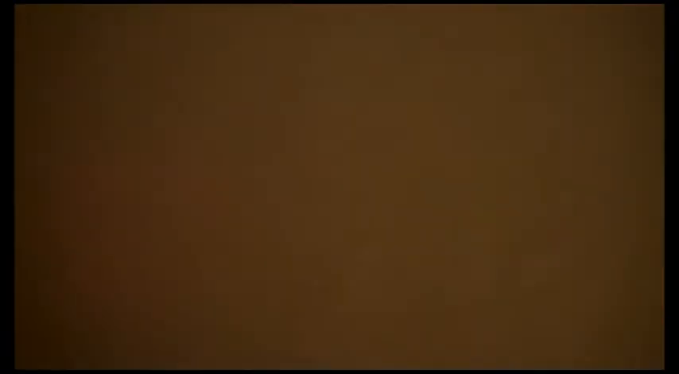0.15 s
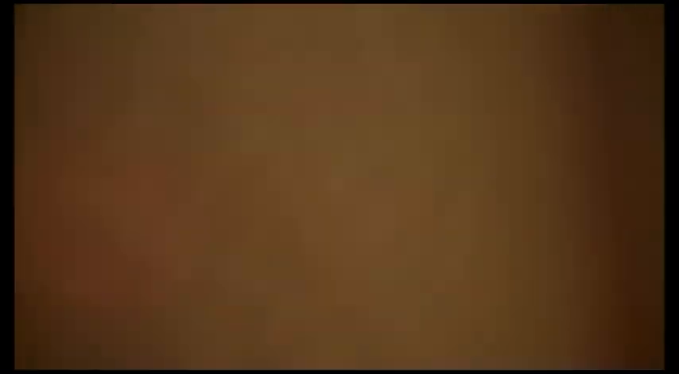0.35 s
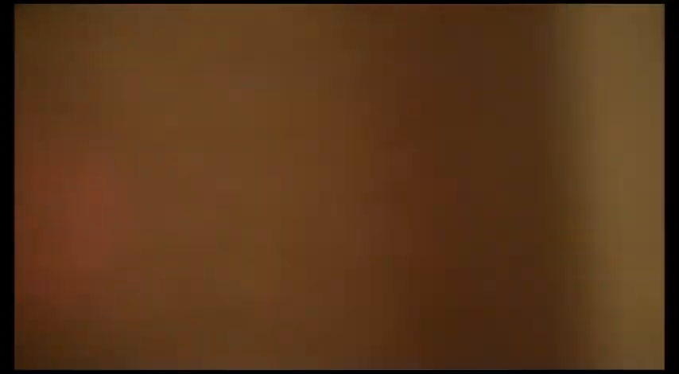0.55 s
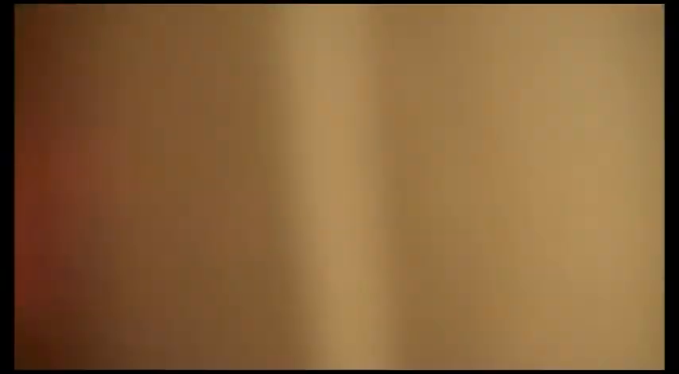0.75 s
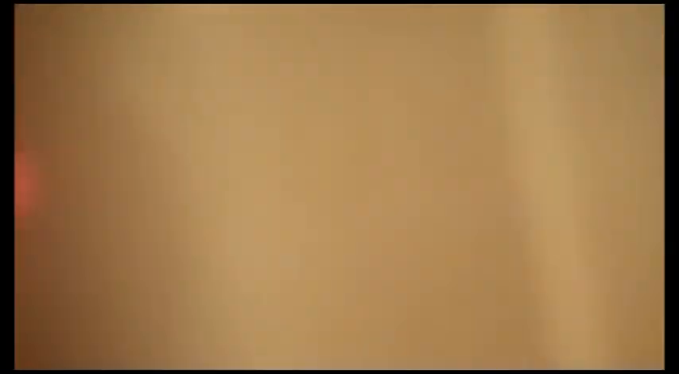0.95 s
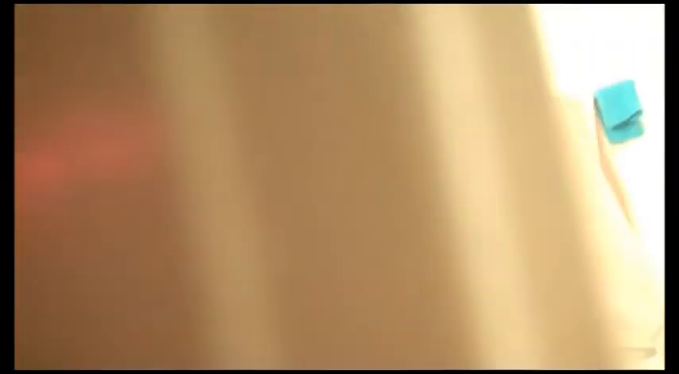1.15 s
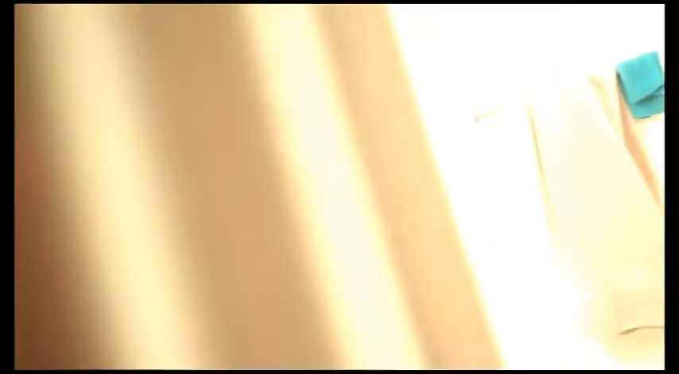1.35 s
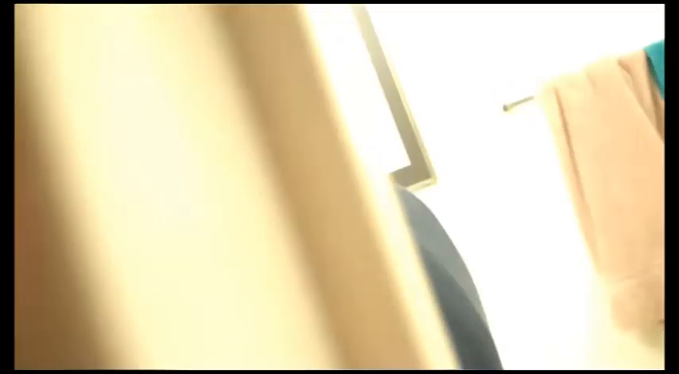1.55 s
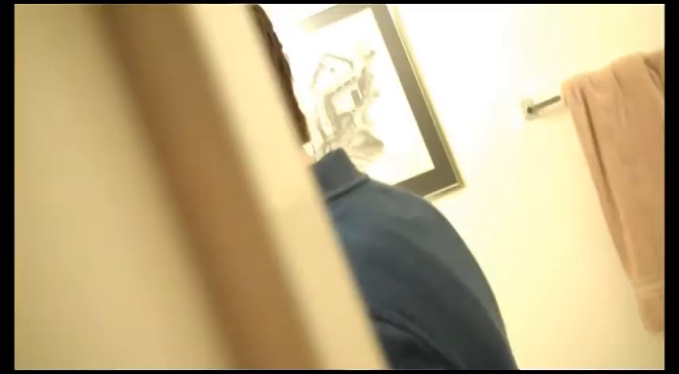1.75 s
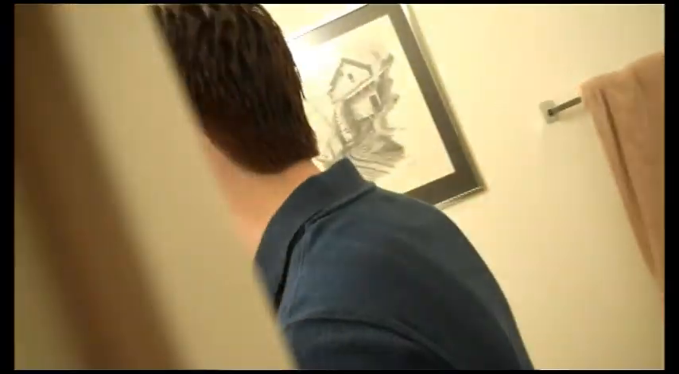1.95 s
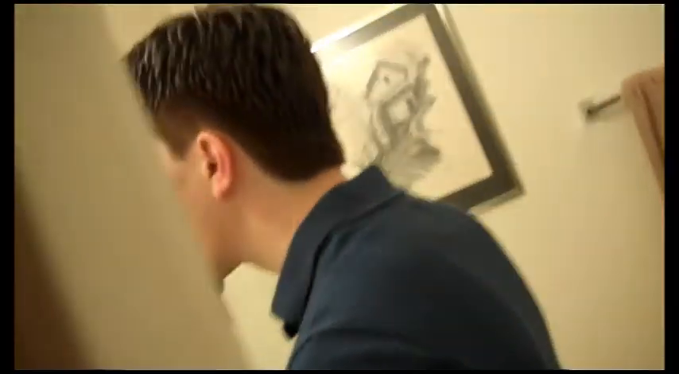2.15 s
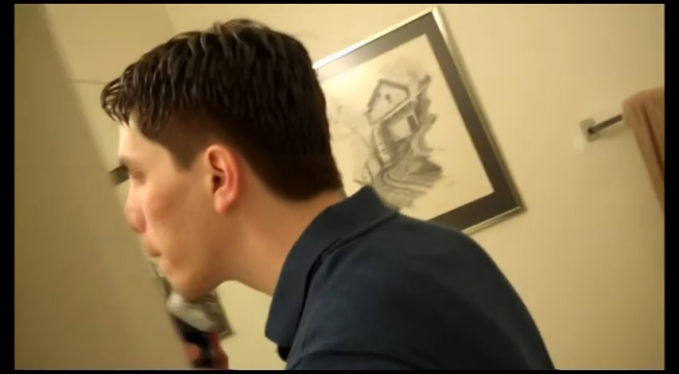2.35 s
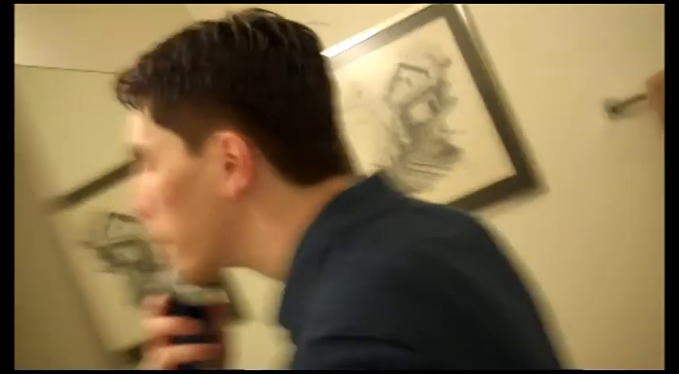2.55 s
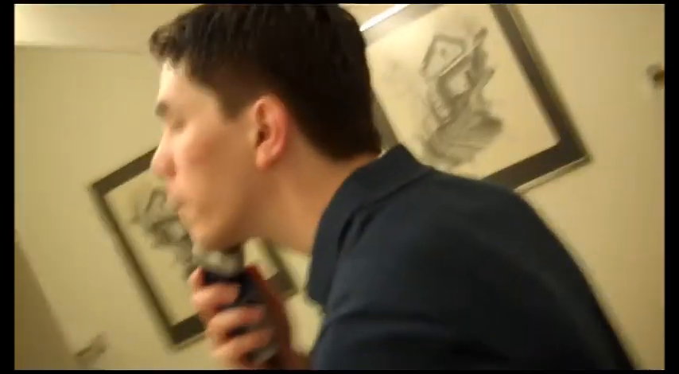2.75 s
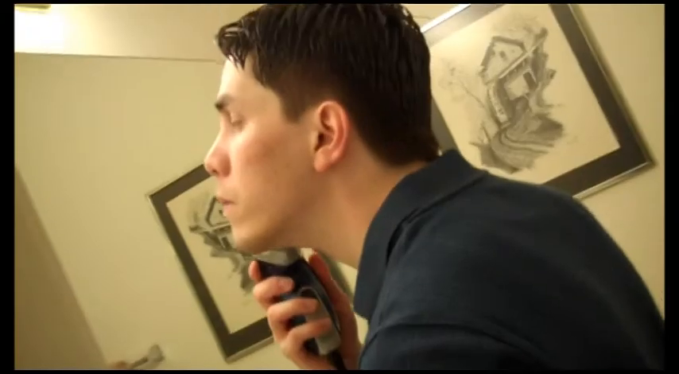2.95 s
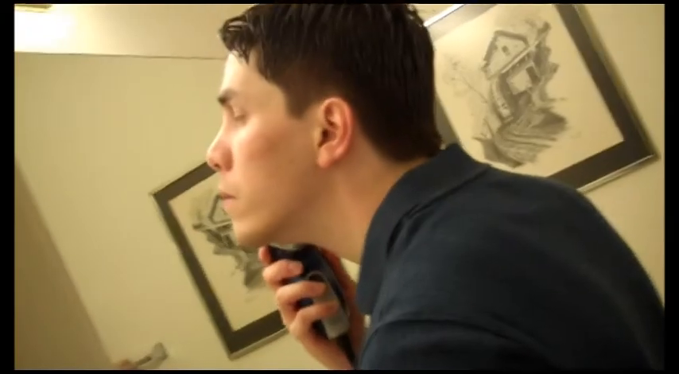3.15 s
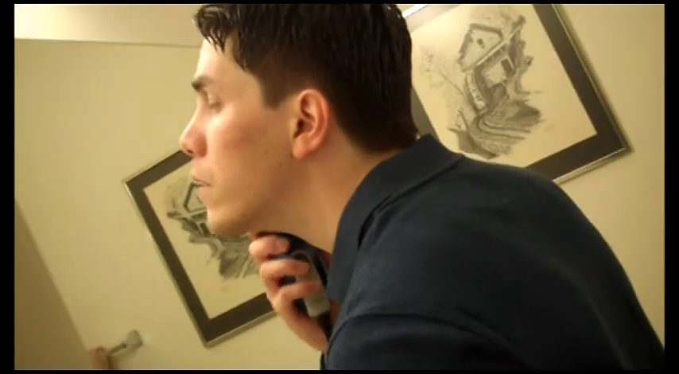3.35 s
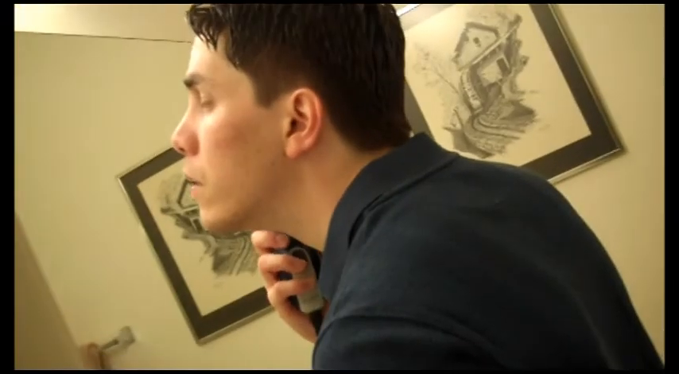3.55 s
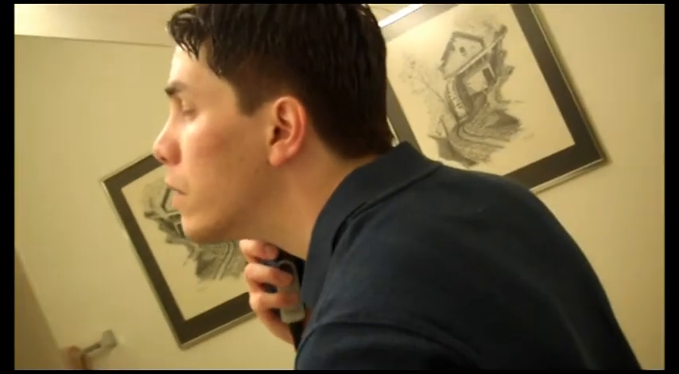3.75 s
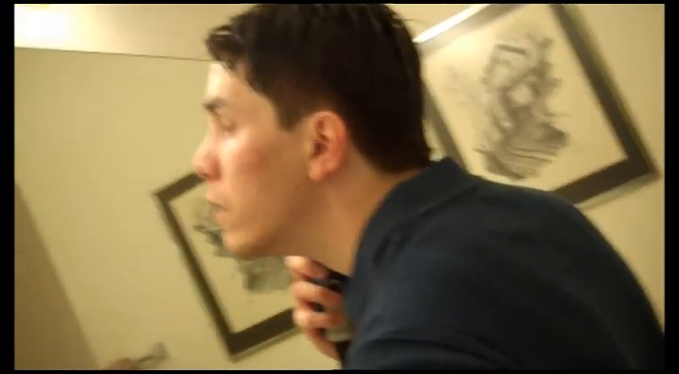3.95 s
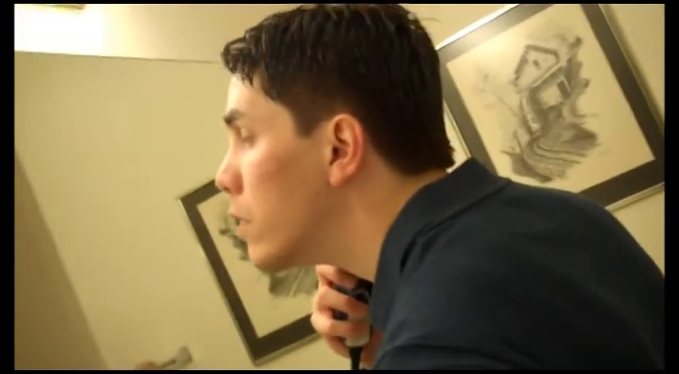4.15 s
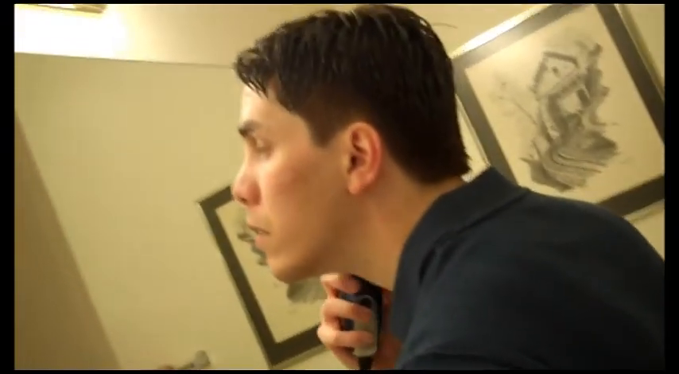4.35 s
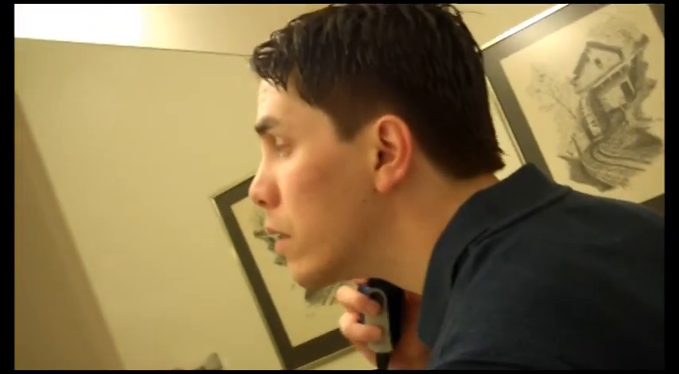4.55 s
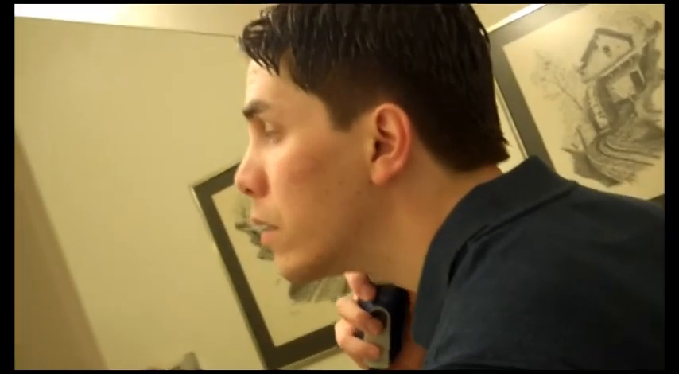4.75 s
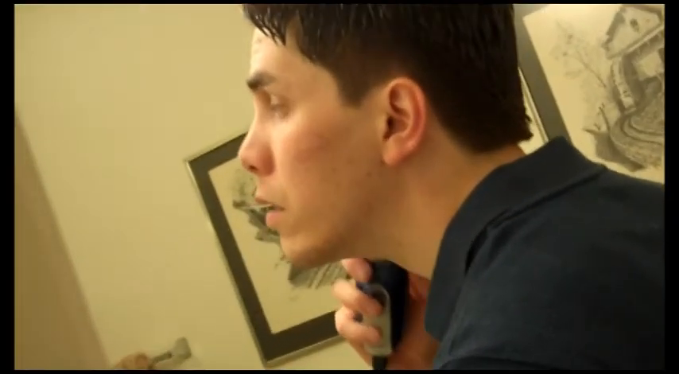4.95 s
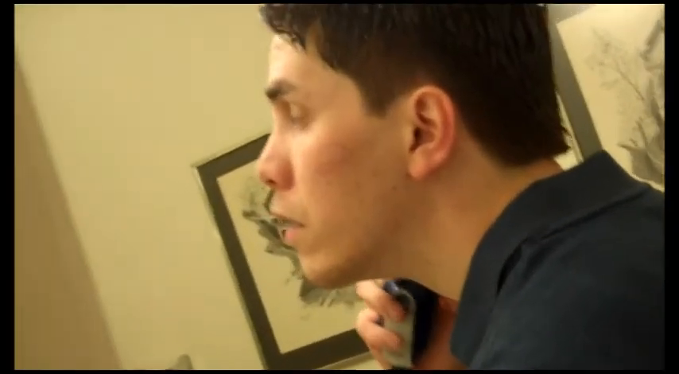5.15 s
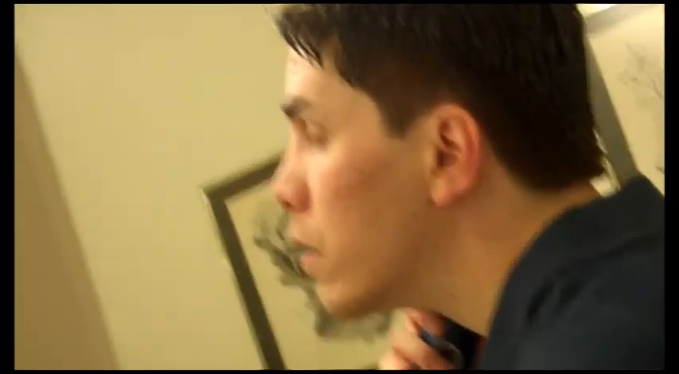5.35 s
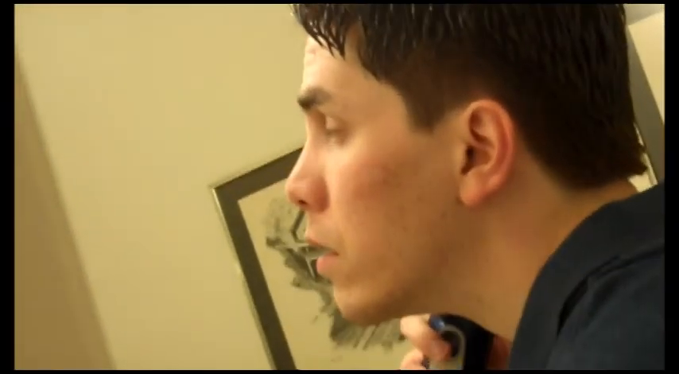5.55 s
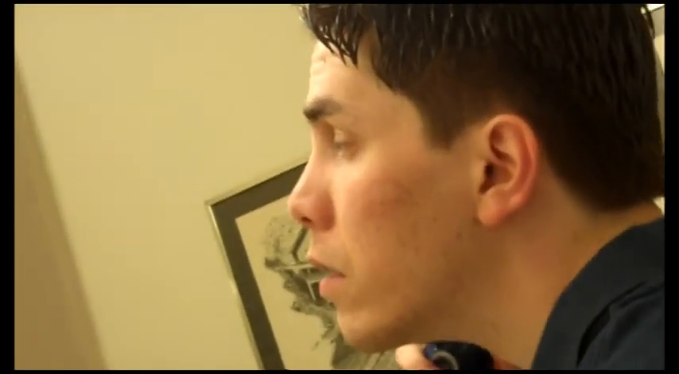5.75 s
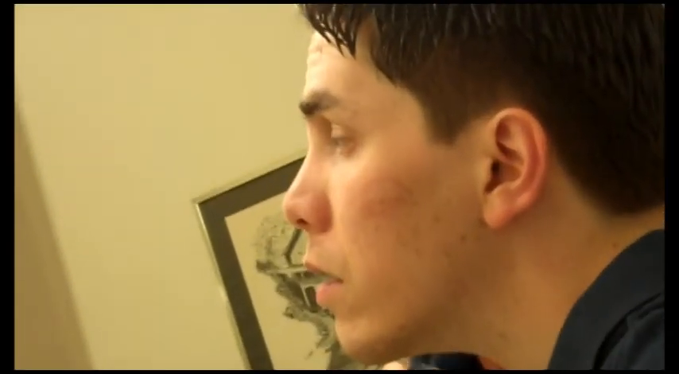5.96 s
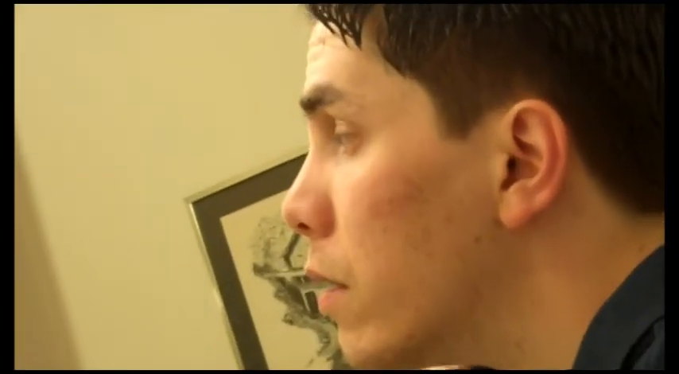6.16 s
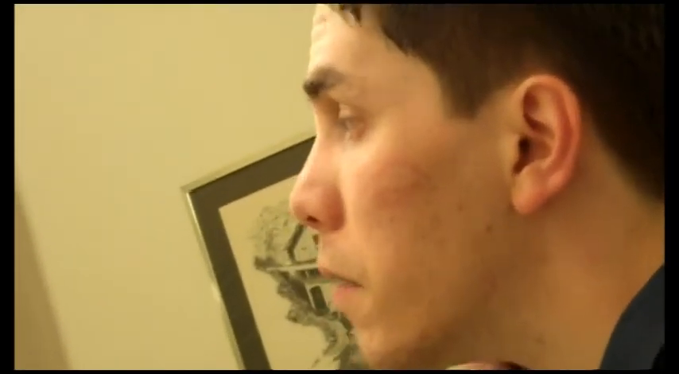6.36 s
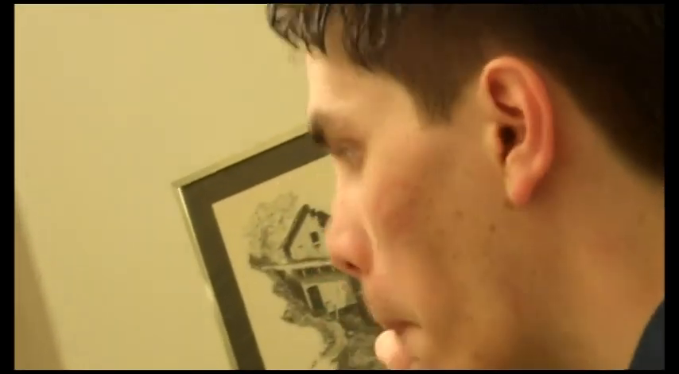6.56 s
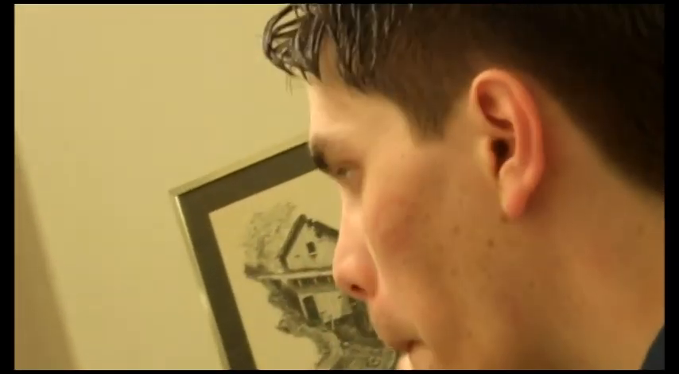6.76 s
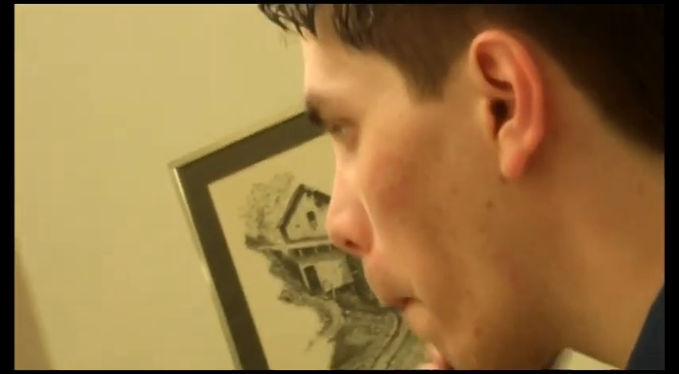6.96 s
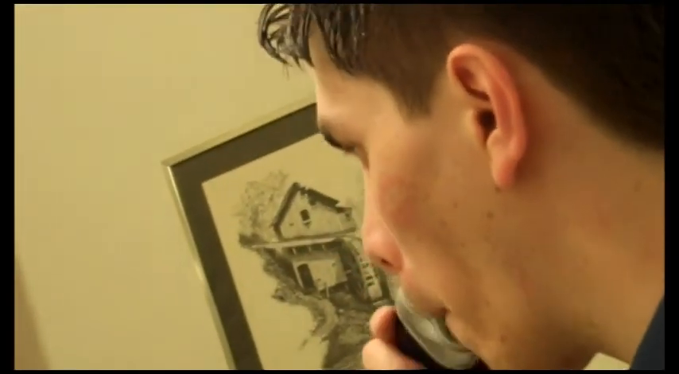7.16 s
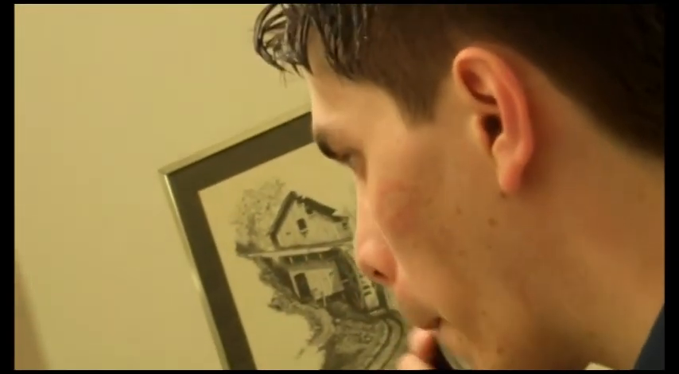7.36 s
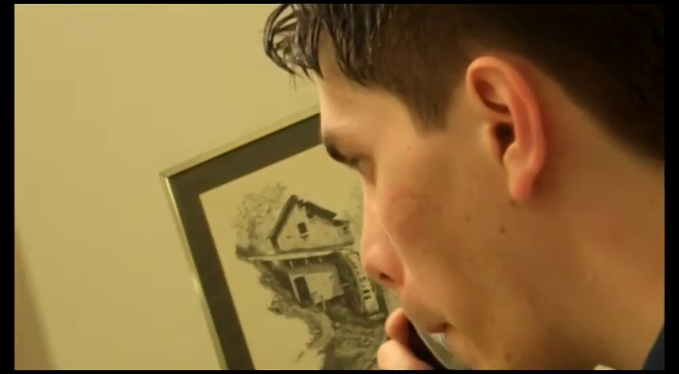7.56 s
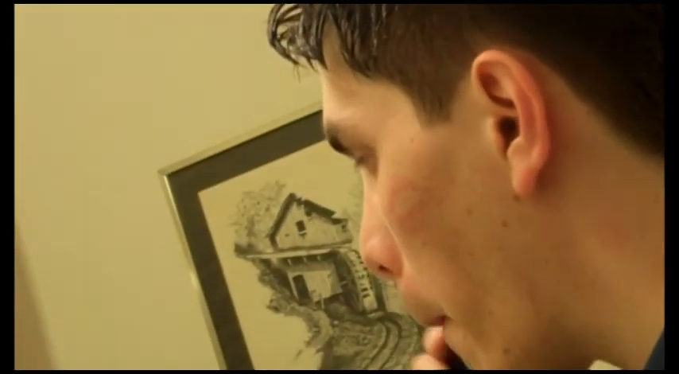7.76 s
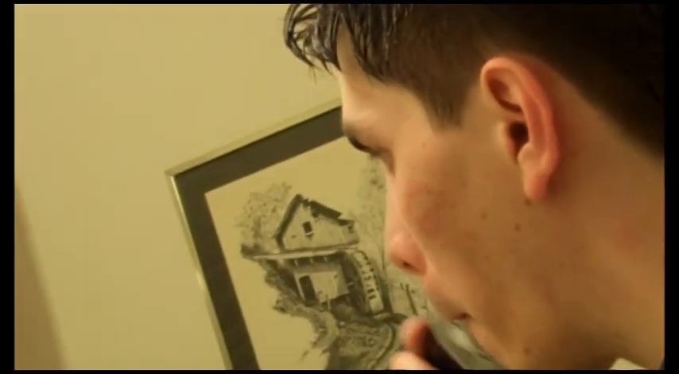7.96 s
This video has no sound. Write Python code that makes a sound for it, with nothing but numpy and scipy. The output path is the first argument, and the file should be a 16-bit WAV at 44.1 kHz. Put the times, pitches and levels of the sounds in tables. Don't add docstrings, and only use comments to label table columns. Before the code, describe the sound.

Continuous electric shaving in a small reverberant bathroom, picked up by a moving handheld microphone. Muffled buzz and low rustling of fingers come first, then brighter cutter hiss and a stronger whining motor. The tone shifts with skin pressure, with short scratchy swells and thin ringing resonances. A very quiet fan hum lies beneath, and a tiny cloth creak passes midway before the shaver carries on to the end.

```python
import sys
import numpy as np
from scipy import signal
from scipy.fft import rfft, irfft, next_fast_len
from scipy.io import wavfile
from scipy.ndimage import uniform_filter1d

SR = 44100
rng = np.random.default_rng(int(sys.argv[2]) if len(sys.argv) > 2 else 0)


def amp(db):
    return 10 ** (np.asarray(db, float) / 20)


def write(x):
    x = np.atleast_2d(x).T
    wavfile.write(sys.argv[1], SR, np.round(np.clip(x, -1, 1) * 32767).astype(np.int16))


N = 356945
PADDED = next_fast_len(N + SR)
FREQS_HZ = np.maximum(np.arange(PADDED // 2 + 1) * SR / PADDED, 1)
COARSE_S = np.arange(N // 64 + 2) * 64 / SR

# (time [s], peak level [dB], mode [Hz])
CREAK_JERKS = [
    (3.349, -42, 410),
    (3.36, -42, 400),
    (3.371, -38, 454),
    (3.404, -40.5, 445),
    (3.416, -41.5, 460),
    (3.432, -44, 450),
    (3.456, -43.5, 447),
    (3.493, -48.5, 395),
]
# (time [s], speed [turns/s])
MOTOR_SPEED = [(0, 103), (1.35, 99.6), (1.9, 98.5), (2.2, 102), (2.58, 101.8), (3.3, 105.6), (3.45, 103.8),
               (4.1, 102.5), (4.5, 104.6), (4.86, 101.5), (5.06, 107.6), (5.4, 106.3), (6.3, 105.6),
               (6.58, 107.3), (7.25, 105.8), (7.55, 102.5), (7.85, 102.7), (7.92, 105.8)]
# (order [multiple of speed], level [dB])
MOTOR_ORDERS = [(3, -76.5), (4, -78), (5, -74), (6, -72), (7, -68.5), (8, -72.5), (9, -71), (10, -66),
                (13, -67.5), (18, -59.5)]
# (start [s], end [s], lift [dB])
FREE_GRIP = [(1.3, 2.0, 5), (2.21, 2.322, 8), (2.544, 4.098, 7), (4.292, 4.4, 7), (5.3, 5.46, 8),
             (5.502, 6.304, 2.5), (6.683, 7.105, 6.5), (7.22, 8.04, 3.5)]
# (start [s], end [s], whine lift [dB], second multiple lift [dB])
GEAR_LOADS = [(0.852, 1.33, 2, -11), (1.356, 1.71, 10, -14.5), (1.776, 2.012, 9.5, 2),
              (2.164, 2.423, 6.5, 2), (2.548, 3.003, 11.5, -19), (3.0, 3.743, 12, -13),
              (3.748, 4.08, 6.5, 4), (4.08, 4.3, 2.5, 6), (4.335, 4.499, 9.5, 4), (4.5, 4.62, 7.5, -7),
              (4.62, 4.876, 0, 8), (4.89, 5.35, 8.5, -6), (5.35, 5.595, 8, -4), (5.594, 5.8, 9, 2.5),
              (5.796, 6.33, 8, -7), (6.342, 6.45, 5, 7), (6.458, 6.653, 10, 2), (6.967, 7.048, 14.5, -13),
              (7.054, 7.2, 8, -5), (7.202, 7.315, 8, 10.5), (7.321, 7.413, 1, 11), (7.9, 8.038, 13, -4),
              (8.023, 8.2, 7.5, -11)]
# (time [s], pitch scatter [Hz])
GEAR_PLAY = [(0, 16), (1.72, 16), (1.8, 34), (2.15, 22), (2.5, 22), (2.7, 38), (4.6, 36), (4.9, 30),
             (8.1, 38)]
# (time [s], level [dB])
NEARNESS = [(0.0, -36.5), (0.02, -38), (0.65, -36.5), (1.87, -32), (2.05, -32.5), (2.32, -30.5),
            (2.41, -33), (2.79, -30.5), (3.7, -32), (3.76, -31), (6.44, -32), (6.58, -31.5), (6.67, -33),
            (7.37, -30), (7.5, -31), (7.89, -29.5), (8.0, -32), (8.09, -29.5)]
# (time [s], left minus right [dB])
STEREO_LEAN = [(0.0, -2.5), (0.38, -3.5), (0.85, -4), (1.62, -1), (3.54, -1.5), (4.8, -1.0), (5.97, -1),
               (6.35, -1), (8.09, -1)]
HISS_CENTRES_HZ = (350, 1500, 5500, 12000)
# (frequency [Hz], density [dB/Hz])
LEFT_PORT = [(250, -34.5), (500, -28), (1000, -20), (2900, -15), (4300, -12), (5500, -9), (6200, -11),
             (6800, -4), (7500, -6), (9000, -20), (11500, -32), (12500, -31.5), (13400, -28.5),
             (14300, -31)]
RIGHT_PORT = [(250, -38.5), (500, -28), (1000, -19), (2900, -12.5), (4300, -9), (5200, -4.5), (5800, -2.5),
              (6500, -9), (7300, -14), (8500, -25.5), (9600, -31), (11000, -44), (12500, -40), (14300, -47)]
# (frequency [Hz], likeness [0-1])
LIKENESS = [(60, 0.17), (150, 0.66), (370, 0.95), (940, 0.91), (2340, 0.49), (5850, 0.061), (14600, 0.47)]
# (frequency [Hz], width [Hz], lift [dB])
RESONANCES = [(447, 35, -2.5), (630.5, 8, 9), (1129, 58, 5), (1386, 25, 0.5), (1566, 190, 3), (1899, 37, 4),
              (2211, 47, 5), (3336, 70, 4.5), (3400, 660, 1), (6230, 320, 3.5), (5860, 67, 4),
              (3000, 180, -1), (1055, 27, 4), (3990, 60, 2), (4770, 200, 1.5)]
# (time [s], half-length [s], frequency [Hz], lift [dB])
SHADING = [(0.43, 0.25, 1980, -6.5), (0.3, 0.25, 3300, 5.5), (0.93, 0.47, 680, -14.5),
           (0.92, 0.31, 3300, -1), (1.1, 0.95, 1660, 5), (2.1, 0.32, 2000, -5.5), (2.58, 0.11, 2200, 1),
           (2.82, 0.22, 4300, 3.5), (0.7, 0.17, 2840, 0), (1.15, 0.087, 3600, -1), (2.74, 0.28, 1360, -6),
           (3.64, 0.23, 1870, 4.5), (3.87, 0.47, 4600, -5), (6.94, 0.21, 5400, 2), (7.36, 0.15, 1400, 4.5),
           (0.76, 0.24, 4760, -5), (0.6, 0.18, 2870, -6), (5.68, 0.21, 4800, -6.5), (6.6, 0.064, 1150, 8),
           (1.58, 0.16, 5200, 3.5), (5.0, 0.099, 1980, -14), (7.97, 0.13, 2400, -4.5),
           (7.4, 0.33, 14000, 6), (5.4, 0.079, 5600, 0.5), (7.6, 0.13, 3600, -2.5), (5.1, 0.11, 5600, -1.5),
           (2.47, 0.076, 4200, -1.5), (0.48, 0.12, 4900, -4.5), (6.27, 0.23, 4800, -3.5),
           (0.3, 0.2, 4200, -2), (0.77, 0.64, 6700, -3), (0.085, 0.14, 6500, -2.5), (4.57, 0.2, 5600, -3),
           (5.1, 0.36, 4100, -2.5), (0.92, 0.25, 4300, -2), (2.93, 0.16, 3700, -2), (5.9, 0.15, 6000, 1),
           (4.03, 0.27, 8800, -5), (3.1, 0.16, 4700, -2)]
# (time [s], half-length [s], lift [dB])
STROKES = [(1.86, 0.094, 5.5), (2.28, .06, 1.5), (2.93, 0.44, 2.5), (3.2, 0.034, 1.5), (3.75, 0.17, 1),
           (4.15, 0.12, 1.5), (4.72, 0.2, 3.5), (5.22, 0.14, 3), (5.7, 0.066, 0), (6.2, 0.28, 2),
           (7.41, 0.049, 5), (7.7, 0.068, 1), (7.84, 0.024, 4)]
STROKE_REACH = (0.78, 1, 0.11, 0.14)
# (time [s], half-length [s], lift [dB])
HANDLING = [
    (.3, 0.2, 10.5),
    (.5, 0.036, 6),
    (.9, 0.31, 12),
    (2.45, 0.29, 4),
    (4.12, 0.085, 3),
    (5.05, 0.37, 1.5),
]
# (start [s], end [s],
# frequency [Hz], level [dB])
SINGING = [(.05, .25, 1170, -62), (.8, 1.05, 1680, -54), (1.07, 1.33, 1640, -50), (1.0, 1.62, 1152, -50.5),
           (1.1, 1.7, 1795, -60), (.95, 1.25, 700, -65), (1.4, 1.78, 632, -62), (2.6, 3.1, 1135, -61),
           (3.45, 3.8, 3730, -53), (3.8, 4.1, 3770, -55), (5.1, 6.6, 742, -66), (3.0, 3.9, 1960, -59),
           (4.0, 4.4, 3630, -53), (4.6, 4.95, 3625, -54), (4.9, 8.1, 1421, -61), (3.3, 8.1, 2181, -60),
           (2.85, 3.3, 1510, -57), (5.8, 6.1, 630, -63), (1.15, 1.4, 1390, -60), (.55, .75, 2190, -62),
           (7.0, 7.4, 1480, -58), (1.95, 2.5, 3350, -55), (3.8, 4.3, 3365, -53), (4.65, 4.87, 4020, -53),
           (7.2, 7.45, 3750, -53), (7.5, 7.9, 3350, -53), (2.6, 4.0, 1737, -60), (3.2, 8.1, 1362, -64),
           (1.25, 1.7, 2140, -56), (7.75, 8.2, 4680, -50), (6.1, 7.1, 1062, -60)]
# (time [s], half-length [s], frequency [Hz], width [Hz], level [dB])
FOCUS = [(2.27, .07, 4600, 110, -41.5), (2.78, .13, 4650, 100, -40), (2.31, .025, 6200, 130, -39),
         (3.58, .045, 1800, 110, -46), (1.88, .06, 1650, 90, -46), (7.41, .02, 1800, 130, -44),
         (6.95, .06, 5250, 90, -44), (7.86, .08, 4700, 90, -44), (7.35, .1, 5700, 90, -42),
         (3.0, .12, 5900, 110, -44), (4.3, .1, 5850, 70, -44), (7.95, .2, 1480, 50, -51),
         (1.14, .04, 1700, 70, -47), (3.78, .07, 6450, 110, -43), (5.38, .08, 6050, 100, -44),
         (2.92, .08, 950, 80, -53), (7.82, .1, 5850, 100, -44), (1.88, .1, 6150, 150, -43),
         (2.12, .12, 6600, 120, -45), (3.85, .08, 6300, 110, -44), (3.5, .12, 5830, 70, -45),
         (2.75, .12, 5600, 90, -45), (6.2, .15, 6050, 90, -45), (2.75, .1, 4050, 90, -48),
         (1.2, .12, 5300, 150, -48)]
# (low [Hz], high [Hz], until [s])
MASKED_EDGE = [
    (10, 130, .46),
    (130, 200, .27),
    (200, 240, .18),
]
# (frequency [Hz], signal over step [dB])
ROUNDING = [(100, 18), (350, 19), (900, 21), (1900, 8.5), (3400, 11), (5000, 19), (7500, 11), (8700, 2),
            (9800, -5.5), (11300, -8.5), (13300, -6), (14200, -10)]
# (frequency [Hz], coarseness [dB])
RIGHT_COARSER = [(7000, 0), (8300, 3), (9300, 1.5), (11500, -1)]

USUAL_DB = -32.5
HISS_FOLLOWS = (0.16, 0.82, 1.26, 0.58)
STROKE_HZ, STROKE_OCTAVES, STROKE_FOCUS = 1800, 0.38, 0.65
SHADE_OCTAVES = 0.22
TEETH_PER_TURN = 31.5
WHINE_DB, SECOND_DB, WHINE_EDGE_S = -51.5, 3.5, 0.019
RUNOUT, HALF_RUNOUT = 0.35, 0.35
DOOR_OPENS_S, DOOR_MUFFLES_DB = 1.3, -4.5
ROOM_T60_S, ROOM_DB = 0.4, -8
FAN_HZ, FAN_DB = 120.0, -68.5
SELF_NOISE_DB = -66
OFFSET, SETTLE_S = (-0.105, 0.105), 0.087
GRID, HOP = 672, 1024
JOINT_BELOW_HZ, STEEP_SHARE = 6000, 0.42
STARVED_DB, STARVED_HZ, STARVED_UNTIL_S = 11, 2600, 1.3


def rms_one(x):
    return x / np.sqrt(np.mean(x ** 2) + 1e-20)


def in_time(rows):
    s, *columns = np.transpose(rows)
    return [np.interp(np.arange(N) / SR, s, c) for c in columns]


def at_hz(points, hz):
    points_hz, values = np.array(points).T
    return np.interp(np.log(hz), np.log(points_hz), values)


def fine(coarse):
    return np.interp(np.arange(N) / SR, COARSE_S, coarse)


def drift(rate_hz):
    r = np.exp(-128 * np.pi * rate_hz / SR)
    noise = rng.standard_normal(len(COARSE_S) + 2000)
    slow = signal.lfilter([1], [1, -2 * r, r * r], noise)[2000:]
    return rms_one(slow - slow.mean())


def bumps(rows):
    return sum(db * np.exp(-((COARSE_S - at) / half) ** 2) for at, half, db in rows)


def held(start, end, edge):
    return np.clip(np.minimum(COARSE_S - start, end - COARSE_S) / edge + 0.5, 0, 1)


def fan():
    level = fine(amp(FAN_DB + 0.67 * drift(7.8)))
    return np.sqrt(2) * level * np.sin(2 * np.pi * FAN_HZ * np.arange(N) / SR)


def creak():
    t, out = np.arange(SR // 10) / SR, np.zeros(N)
    shape = (1 - np.exp(-t / 0.0025)) * amp(-60 * t / 0.055)
    for s, db, hz in CREAK_JERKS:
        out[round(s * SR):][:len(t)] += amp(db + 5.5) * shape * np.sin(2 * np.pi * hz * t)
    return out


def in_room(x):
    t = np.arange(SR // 2) / SR
    tail = rng.standard_normal((2, len(t))) * amp(-60 * t / ROOM_T60_S) * (t > 0.003)
    tail *= amp(ROOM_DB) / np.sqrt(np.sum(tail ** 2, axis=1, keepdims=True))
    tail[0, 1] = tail[1, 0] = 1
    return irfft(rfft(x, PADDED) * rfft(tail, PADDED), PADDED)[:, :N]


def focus():
    t, out = np.arange(N) / SR, np.zeros(N)
    for at, half, hz, width, db in FOCUS:
        swell = amp(db) * np.exp(-((COARSE_S - at) / half) ** 2)
        out += fine(swell * drift(width)) * np.sin(2 * np.pi * hz * t)
        out += fine(swell * drift(width)) * np.cos(2 * np.pi * hz * t)
    return out


def singing():
    t, out = np.arange(N) / SR, np.zeros(N)
    for start, end, hz, db in SINGING:
        fade = np.clip(np.minimum(COARSE_S - start, end - COARSE_S) / 0.05, 0, 1)
        flicker = amp(db + 2 * drift(5))
        wander = np.cumsum(hz * 0.0014 * drift(6)) * 64 / SR
        out += fine(fade * flicker) * np.sin(2 * np.pi * (hz * t + fine(wander)))
    return np.sqrt(2) * out


def hiss_at_ports(grain_db):
    grains = rng.standard_normal((2, PADDED)) * amp(grain_db * rng.standard_normal(PADDED))
    mid, side = rfft(grains)
    alike = np.clip(at_hz(LIKENESS, FREQS_HZ), 0, 1)
    mid, side = np.sqrt(1 + alike) * mid, np.sqrt(1 - alike) * side
    one_sample_late = np.exp(-2j * np.pi * FREQS_HZ / SR)
    left = (mid + side) * one_sample_late * amp(at_hz(LEFT_PORT, FREQS_HZ))
    right = (mid - side) * amp(at_hz(RIGHT_PORT, FREQS_HZ))
    lift_db = sum(db / (1 + (2 * (FREQS_HZ - hz) / width) ** 2) for hz, width, db in RESONANCES)
    return np.array([left, right]) * amp(lift_db) * np.minimum(FREQS_HZ / 250, 1) ** 2


def hiss(near_db, patchy_db, grain_db):
    ports = hiss_at_ports(grain_db)
    region_db = np.outer(HISS_FOLLOWS, near_db) + np.outer(STROKE_REACH, bumps(STROKES))
    region_db[0] += bumps(HANDLING) - 1.5
    region_db[1] -= 1.5
    centres_hz = np.r_[250, 400, np.geomspace(560, 8000, 16), 10500, 14000]
    together, out, log_hz = drift(44.0), np.zeros((2, N)), np.log(FREQS_HZ)
    for k, centre in enumerate(centres_hz):
        region = np.interp(np.log(centre), np.log(HISS_CENTRES_HZ), range(4))
        low = min(int(region), 2)
        gain_db = region_db[low] + (region - low) * (region_db[low + 1] - region_db[low])
        gain_db += patchy_db * (0.29 * together + 0.65 * drift(2.6) + drift(28.0))
        jaw = np.exp(-(np.log2(centre / STROKE_HZ) / STROKE_OCTAVES) ** 2)
        gain_db += STROKE_FOCUS * bumps(STROKES) * jaw
        for at, half, hz, db in SHADING:
            octaves = np.log2(centre / hz) / SHADE_OCTAVES
            gain_db += db * np.exp(-((COARSE_S - at) / half) ** 2 - octaves ** 2)
        mask = np.interp(log_hz, np.log(centres_hz), np.arange(len(centres_hz)) == k)
        out += fine(amp(gain_db)) * irfft(ports * mask, PADDED)[:, :N]
    return out * amp(-20.0)


def gear(turns, near_db):
    whine_db = WHINE_DB + near_db
    second_db = SECOND_DB
    for start, end, whine_lift_db, second_lift_db in GEAR_LOADS:
        load = held(start, end, WHINE_EDGE_S)
        whine_db = whine_db + whine_lift_db * load
        second_db = second_db + second_lift_db * load
    scatter_hz = in_time(GEAR_PLAY)[0] * fine(drift(60) + 0.12 * drift(9))
    mesh = 2 * np.pi * (TEETH_PER_TURN * turns + np.cumsum(scatter_hz) / SR)
    throb = 1 + RUNOUT * np.sin(2 * np.pi * turns + fine(drift(8)))
    throb += HALF_RUNOUT * np.sin(np.pi * turns + fine(drift(8)))
    first = fine(amp(whine_db + 2.0 * drift(45))) * np.sin(mesh) * throb
    second = fine(amp(whine_db + second_db + 1.6 * drift(28.0))) * np.sin(2 * mesh)
    return first + second


def motor(turns, level_db):
    out = np.zeros(N)
    grip_db = sum(db * held(a, b, 0.036) for a, b, db in FREE_GRIP)
    door_db = DOOR_MUFFLES_DB * held(-1, DOOR_OPENS_S, 0.35)
    for order, db in MOTOR_ORDERS:
        wobble = fine(order * 0.0068 * drift(7.3) + rng.random())
        order_db = db + (order == 3) * grip_db + (order > 5) * door_db + 2.5 * drift(4.0)
        out += fine(amp(order_db)) * np.sin(2 * np.pi * (order * turns + wobble))
    return np.sqrt(2) * amp(level_db) * out


def scene():
    turns = np.cumsum(in_time(MOTOR_SPEED)[0]) / SR
    near_db = np.interp(COARSE_S, *np.transpose(NEARNESS)) - USUAL_DB
    tones = in_room(motor(turns, fine(near_db + 2.0)) + gear(turns, near_db) + singing() + focus())
    lean_db = in_time(STEREO_LEAN)[0] + 1.7
    balance = amp(np.array([lean_db, -lean_db]) / 2)
    shaver = (tones + hiss(near_db, patchy_db=1.0, grain_db=2.0)) * balance
    return shaver + fan() + creak()


def sum_difference(lines):
    return np.array([lines[0] + lines[1], lines[0] - lines[1]])


def spectral_rounding(x, uneven_db):
    n, k = np.arange(2 * HOP), np.arange(HOP)
    hz = (k + 0.5) * SR / (2 * HOP)
    basis = np.cos(np.pi / HOP * np.outer(n + 0.5 + HOP / 2, k + 0.5)).astype(np.float32)
    ends = (2 * HOP - GRID, 2 * HOP - (N - GRID) % HOP)
    blocks = np.pad(x.astype(np.float32), ((0, 0), ends), mode="reflect").reshape(2, -1, HOP)

    bell = np.cumsum(np.kaiser(HOP + 1, 4 * np.pi))
    steep = np.sqrt(bell[:-1] / bell[-1])
    gentle = np.sin(np.pi * (k + 0.5) / (2 * HOP))
    rise = np.where(rng.random((blocks.shape[1], 1)) < STEEP_SHARE, steep, gentle)
    window = np.hstack([rise[:-1], rise[1:, ::-1]]).astype(np.float32)
    lines = (np.concatenate([blocks[:, :-1], blocks[:, 1:]], axis=2) * window) @ basis
    joint = hz < JOINT_BELOW_HZ
    lines = np.where(joint, sum_difference(lines) / 2, lines)

    power = uniform_filter1d(uniform_filter1d(lines ** 2, size=24, axis=2), size=3, axis=1)
    level = np.sqrt(power.clip(1e-20))
    level = np.where(joint & (hz > 300), level[0], level)
    chance = rng.standard_normal(lines.shape[:2] + (HOP // 16,))
    chance = rms_one(uniform_filter1d(chance, size=3, axis=1))
    quiet = np.clip(STARVED_UNTIL_S - np.arange(len(window)) * HOP / SR, 0, 1)
    coarser_db = np.outer((0, 1), at_hz(RIGHT_COARSER, hz))[:, None]
    coarser_db = coarser_db + STARVED_DB * np.outer(quiet, np.exp(-np.log2(hz / STARVED_HZ) ** 2))
    step = level / amp(at_hz(ROUNDING, hz) + uneven_db * np.repeat(chance, 16, axis=2) - coarser_db)
    lines = np.sign(lines) * np.floor(np.abs(lines) / step + 0.39) * step

    lines = np.where(joint, sum_difference(lines), lines)
    frames = lines.astype(np.float32) @ basis.T * window * 2 / HOP
    joined = frames[:, :-1, HOP:] + frames[:, 1:, :HOP]
    return joined.reshape(2, -1)[:, HOP - GRID:][:, :N]


def empty_low_bands(heard):
    t = np.arange(SR) / SR
    start = rfft(heard[:, :SR])
    hz = np.arange(SR // 2 + 1)
    for low_hz, high_hz, until_s in MASKED_EDGE:
        band = irfft(start * ((hz >= low_hz) & (hz < high_hz)), SR)
        heard[:, :SR] -= band * np.clip((until_s - t) / 0.02, 0, 1)
    return heard


def settling_offset():
    t = np.arange(N) / SR
    ripple = 0.014 * np.sin(2 * np.pi * np.outer((38, 47), t)) * (1 + 5 * t)
    lumps = 1 + ([[-0.05], [0.05]] + ripple) * np.clip((0.187 - t) / 0.02, 0, 1)
    return np.outer(OFFSET, (1 + t / SETTLE_S) * np.exp(-t / SETTLE_S)) * lumps


def top_cut(x):
    return signal.sosfilt(signal.butter(12, 14250, fs=SR, output="sos"), x)


def record(dry):
    low_pass = signal.butter(1, 600, fs=SR, output="sos")
    own_noise = signal.sosfilt(low_pass, rng.standard_normal((2, N)))
    heard = empty_low_bands(dry + amp(SELF_NOISE_DB) * rms_one(own_noise))
    mix = spectral_rounding(heard, uneven_db=4.2) + settling_offset()
    return top_cut(mix)


dry = scene()
out = record(dry)
write(out)
```